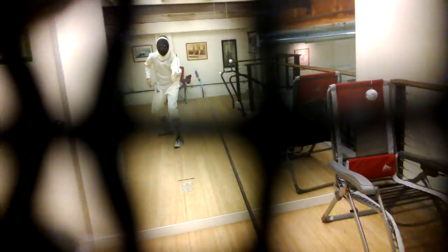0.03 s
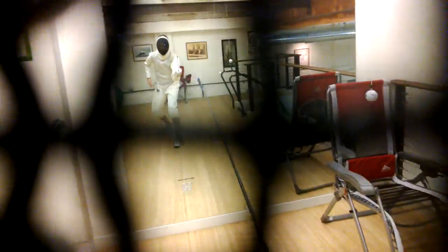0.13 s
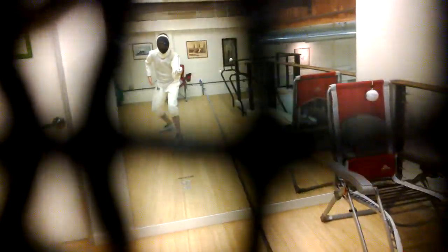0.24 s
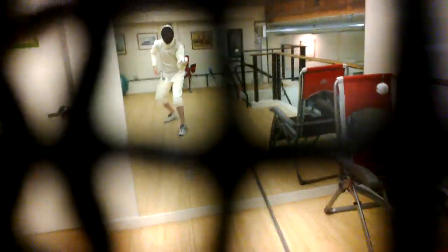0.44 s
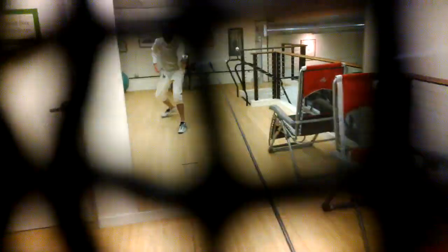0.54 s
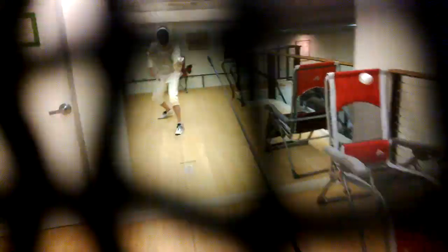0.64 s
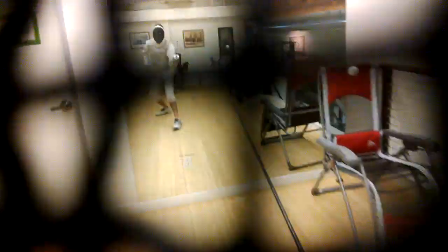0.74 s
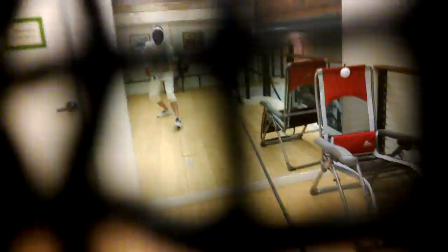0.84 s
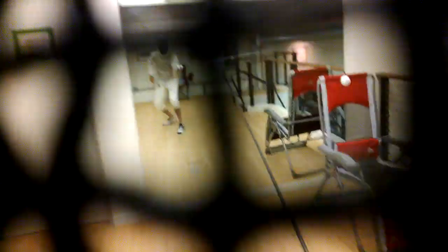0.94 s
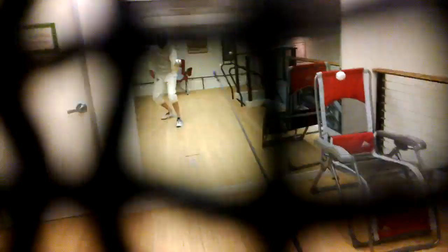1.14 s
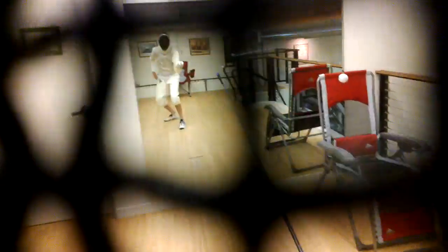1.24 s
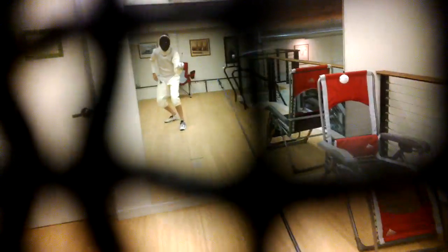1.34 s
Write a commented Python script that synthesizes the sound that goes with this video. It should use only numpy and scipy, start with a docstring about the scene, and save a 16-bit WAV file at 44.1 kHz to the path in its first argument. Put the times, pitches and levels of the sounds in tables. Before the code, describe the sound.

Steel fencing swords snap together, grate and ring at close range in a lightly echoing indoor hall

```python
"""Two fencing blades meet four times, then graze faintly, in a hall: each contact snaps, then scrapes. The
scrape is noise with tiny clicks, coloured by the steel; the guard hums along as filtered friction. The blades
and the guard sing in pairs of close sine tones that beat, with a few short squeals. Knocks (a noise tick plus
guard ring), dull scuffs, a late low rumble and quiet hall noise are shaped noise. A fading noise tail gives the
echo of the hall."""
import sys
import numpy as np
from scipy import signal
from scipy.fft import rfft, irfft, next_fast_len
from scipy.io import wavfile
from scipy.ndimage import uniform_filter1d, map_coordinates

SR = 44100
rng = np.random.default_rng(int(sys.argv[2]) if len(sys.argv) > 2 else 0)


def digitize_waveform(pressure):
    """Quantize a signal to 16-bit integers and store it at the path in sys.argv[1].

    Rows of a 2-D input are taken as channels; values are limited to [-1, 1].
    """
    field = np.atleast_2d(pressure).T
    bounded = np.clip(field, -1, 1)
    quanta = np.round(bounded * 32767).astype(np.int16)
    wavfile.write(sys.argv[1], SR, quanta)


N = 61739  # length in samples


def amp(db):
    """Turn decibels into a gain."""
    return 10 ** (np.asarray(db) / 20)


def unit(x):
    """Scale to an average (rms) strength of 1."""
    return x / np.sqrt(np.mean(x ** 2) + 1e-20)


def clock():
    """The time of each sample, in seconds."""
    return np.arange(N) / SR


def along(points, hz):
    """Read a curve of (frequency, value) points on a log frequency axis."""
    f, v = np.transpose(points)
    return np.interp(np.log(hz + 1), np.log(f + 1), v)


def wobble(position):
    """A smooth random curve with one random knot per unit of position."""
    knots = rng.standard_normal(int(position.max()) + 4)
    return map_coordinates(knots, [position])


def filtered(x, response):
    """Shape the spectrum of x with a response, given as a function of frequency."""
    m = next_fast_len(N + SR // 2)
    hz = np.fft.rfftfreq(m, 1 / SR)
    return irfft(rfft(x, m) * response(hz), m)[..., :N]


def noise(points):
    """Noise of rms 1 with the given colour."""
    return unit(filtered(rng.standard_normal(N), lambda hz: amp(along(points, hz))))


def envelope(start, rise, hold, t60):
    """Rise from the start, begin to fade hold s after it, and lose 60 dB every t60 s."""
    t = clock() - start
    fade = amp(-60 * np.maximum(t - hold, 0) / t60)
    return np.clip(t / rise, 0, 1) * fade


# colour of the quiet hall noise: (frequency [Hz], level [dB])
QUIET_COLOUR = [(20, -1), (55, -9), (150, 2), (300, -7), (600, -5.5), (1200, -19.5), (4000, -37.5),
                (14000, -55.5)]
QUIET_DB = -80


def quiet():
    """The quiet of the hall: steady, mostly low noise."""
    return amp(QUIET_DB) * noise(QUIET_COLOUR)


# colour of the low rumble: (frequency [Hz], level [dB])
RUMBLE_COLOUR = [(20, -25.5), (54, 1), (75, -16), (145, -8), (220, -14.5), (400, -19.5), (900, -29),
                 (3000, -76)]
RUMBLE_AT_S, RUMBLE_RISE_S, RUMBLE_HOLD_S, RUMBLE_T60_S, RUMBLE_DB = 1.023, 0.15, 0.19, 1, -59


def rumble():
    """A late rumble: low noise that swells slowly and fades."""
    shape = envelope(RUMBLE_AT_S, RUMBLE_RISE_S, RUMBLE_HOLD_S, RUMBLE_T60_S)
    return amp(RUMBLE_DB) * noise(RUMBLE_COLOUR) * shape


# time for the hall echo to fall by 60 dB: (frequency [Hz], fade time [s])
HALL_FADE = [(200, .8), (1200, 0.67), (2500, 0.85), (4500, 0.73), (8000, 0.49), (13000, 0.31)]
WALL_DELAY_S = .02


def hall(x):
    """The hall answers after a short delay with a noise tail; its high treble dies first."""
    hz, t, z = signal.stft(rng.standard_normal(SR), SR, nperseg=256)
    fade = amp(-60 * t / along(HALL_FADE, hz)[:, None])
    tail = signal.istft(z * fade, SR, nperseg=256)[1]
    delayed = np.pad(x, (int(WALL_DELAY_S * SR), 0))
    return signal.fftconvolve(delayed, tail / np.linalg.norm(tail))[:N]


# dull scuffs: (time [s], level [dB], rise [s], time to fade by 60 dB [s])
SCUFF_EVENTS = [(0.429, -62, 0.027, 0.31), (0.573, -43.5, 0.014, 0.97), (0.883, -41, 0.0076, 0.4),
                (1.06, -65, 0.024, 1.6)]
# colour of a scuff: (frequency [Hz], level [dB])
SCUFF_COLOUR = [(60, -46), (115, -29), (175, -7), (400, -2), (750, 4), (1400, 2.5), (2300, -13),
                (4000, -18.5), (12000, -50)]


def scuffs():
    """Dull scuffs: noise strongest in the middle range, rising quickly and fading."""
    return sum(amp(db) * noise(SCUFF_COLOUR) * envelope(s, rise, rise, t60)
               for s, db, rise, t60 in SCUFF_EVENTS)


GRAINS_PER_S, GRAIN_SHARE = 1500, .35  # clicks per second, their share of the power


def friction():
    """Rough steel rubbing: tiny random collisions over a smooth hiss."""
    hits = rng.random(N) < GRAINS_PER_S / SR
    grains = unit(hits * rng.uniform(-1.04, 1, N))
    hiss = rng.standard_normal(N)
    return np.sqrt(GRAIN_SHARE) * grains + np.sqrt(1 - GRAIN_SHARE) * hiss


# resonances of the guard: (frequency [Hz], width [Hz], level [dB])
GUARD_MODES = [(570, 200, -21), (779, 90, -11.5), (935, 59, -6.5), (1019.6, 45, 1.5), (1084, 50, -5.5),
               (1214.4, 67, 8), (1348, 70, -19.5), (1446, 170, -6), (1675, 150, -6.5), (1790, 35, -12.5),
               (2230, 250, -14.5)]
GUARD_LOW_HZ = 473  # the thin guard radiates little below this
GUARD_RIPPLE_DB, GUARD_RIPPLE_HZ = 2, 45  # random unevenness, and its spacing in frequency


def guard():
    """The guard's resonances, shaken by friction, at rms 1; their balance differs from blow to blow."""
    def response(hz):
        body = sum(amp(db) / (1 + ((hz - f) / (w / 2)) ** 2) for f, w, db in GUARD_MODES)
        radiation = hz ** 4 / (hz ** 4 + GUARD_LOW_HZ ** 4)
        return body * radiation * amp(GUARD_RIPPLE_DB * wobble(hz / GUARD_RIPPLE_HZ))

    hum = filtered(friction(), response)
    # even out the loudness over about 16 ms (700 samples)
    power = np.abs(uniform_filter1d(hum ** 2, size=700))
    return unit(hum / np.sqrt(power + 1e-12))


# knocks on the guard: (time [s], ring level [dB], tick level [dB])
KNOCK_EVENTS = [(.236, -37.5, -60), (0.8444, -36, -64), (0.8894, -44, -52), (0.8931, -64, -26.5),
                (0.9042, -60, -39.5), (0.931, -39.5, -60), (.941, -41, -56), (1.066, -50, -70)]
# colour of the tick: (frequency [Hz], level [dB])
TICK_COLOUR = [(100, -25), (400, -7.5), (1000, -1.5), (2300, 7.5), (4000, -19), (9000, -19.5), (14000, -19)]
RING_T60_S, TICK_T60_S = 0.047, 0.01424


def knocks():
    """Knocks on the guard: each is a dry tick of noise and a short ring of the guard."""
    out = np.zeros(N)
    for s, ring_db, tick_db in KNOCK_EVENTS:
        out += amp(ring_db) * guard() * envelope(s, 0.0022, 0.0017, RING_T60_S)
        out += amp(tick_db) * noise(TICK_COLOUR) * envelope(s, 0.0017, 0, TICK_T60_S)
    return out


# ringing modes of the blades and the guard: (start [s], frequency [Hz], beat rate [Hz], level [dB], swell [s],
# hold from the start [s], time to fade by 60 dB [s])
SINGING_MODES = [(.22, 1610, 63, -44, .03, 0.081, 0.68), (.22, 2235, 120, -52, 0.013, 0.14, 0.27),
                 (.215, 1210, 22, -40.5, 0.013, 0.047, .45), (.424, 850, 21, -50, .04, 0.18, 1),
                 (0.59, 1035, 5, -40, 0.087, .13, 0.27), (0.54, 1205, 15, -33.5, 0.065, 0.039, 0.39),
                 (0.492, 1817, 44, -40.5, 0.031, .21, 0.55), (0.74, 1817, 44, -43.5, 0.063, 0.059, 0.69),
                 (.424, 2690, 19, -58, 0.08, 0.47, 0.25), (0.43, 3728, 29, -44, 0.047, 0.25, 0.62),
                 (.424, 4845, 23, -40.5, 0.037, 0.27, .3), (.424, 4700, 31, -55, .1, 0.34, 0.28),
                 (0.41, 6200, 20, -66, .08, 0.57, .35), (.424, 7585, 26, -55, 0.068, 0.46, .35),
                 (0.428, 9170, 18, -51, .08, 0.1, .35), (0.83, 932, 22, -46, 0.026, 0.057, 0.44),
                 (.925, 1190, 70, -40, 0.0092, 0.017, 0.13), (1.051, 1130, 36, -50, 0.018, 0.043, 0.43)]
# squeals as the blade sticks and slips: (time [s], width [s], level [dB])
SQUEAL_SPURTS = [(.526, .011, -26), (0.567, 0.0048, -25.5), (0.674, 0.027, -32.5), (0.755, 0.007, -30.5)]
SQUEAL_HZ = 4845
BEAT_DEPTH = .55  # strength of the second tone of a pair
SING_WANDER, SING_WAVER_DB = .65, 1.5  # random drift of phase [radians] and of level


def singing():
    """Pairs of close modes of the blades and guard swell and beat; one high mode also squeals in short spurts."""
    t, out = clock(), np.zeros(N)

    def tone(hz):
        return np.sin(2 * np.pi * (hz * t + rng.random()) + SING_WANDER * wobble(t * 40))

    for s, hz, beat, db, swell, hold, t60 in SINGING_MODES:
        pair = tone(hz) + BEAT_DEPTH * tone(hz - beat)
        level = amp(db + SING_WAVER_DB * wobble(t * 25))
        out += level * pair * envelope(s, swell, hold, t60)
    spurts = sum(amp(db) * np.exp(-.5 * ((t - s) / width) ** 2) for s, width, db in SQUEAL_SPURTS)
    return out + tone(SQUEAL_HZ) * spurts


# colour of the scrape: (frequency [Hz], level [dB])
STEEL_COLOUR = [(1120, -45.5), (1900, -11), (2250, -11), (3030, -17.5), (3620, -11.5), (3900, -12.5),
                (5310, -8.5), (6440, -5), (9220, -1.5), (12400, -2.5), (14000, -7)]
# treble resonances of the blades: (frequency [Hz], width [Hz], lift [dB])
BLADE_MODES = [(4443, 110, 7), (5620, 220, 4.5), (6390, 180, 7.5), (6810, 90, 7.5), (7620, 180, 5),
               (8266, 180, 7.5), (8650, 70, 0.5), (9106, 90, 8), (9400, 40, 5.5), (9870, 90, 6.5),
               (11200, 100, 0.5), (11020, 180, 7), (11610, 60, 7.5), (12000, 130, -2.5)]
STEEL_LOW_HZ = 1763  # the scrape weakens below this
RIPPLE_DB, RIPPLE_HZ = 3, 75  # random unevenness, and its spacing in frequency


def steel(hz):
    """How the blades colour friction: a broad curve, resonances and random ripple."""
    lift = sum(db / (1 + ((hz - f) / (w / 2)) ** 2) for f, w, db in BLADE_MODES)
    ripple = RIPPLE_DB * wobble(hz / RIPPLE_HZ)
    low_cut = hz ** 4 / (hz ** 4 + STEEL_LOW_HZ ** 4)
    return amp(along(STEEL_COLOUR, hz) + lift + ripple) * low_cut


# blade contacts: (time [s], scrape level [dB], hold [s], scrape time to fade by 60 dB [s],
# treble tilt at the start [dB per octave], dulling [dB per octave per s],
# guard level [dB], guard time to fade by 60 dB [s], snap level [dB])
BLADE_CONTACTS = [(0.015, -46, 0.078, 0.41, 2.5, 26, -58.5, 0.95, -63),
                  (0.2089, -26.5, 0.1, 0.24, 3, 32, -44.5, 0.55, -30),
                  (.424, -28, 0.092, 0.69, -0.5, 36, -40.5, 1, -22),
                  (0.8396, -33.5, 0.048, 0.036, -1.5, 14, -39.5, 0.21, -39.5),
                  (1.035, -66, .12, 0.22, -10.5, 22, -59.5, .4, -79.5)]
SNAP_S, SNAP_T60_S = 0.0076, 0.031  # length of the first bite, and its fade
BOUNCE_S, SCRAPE_RISE_S = 0.012, .009  # rebound before the blades bind, then the rise of the scrape
SCRAPE_FLOOR = 0.35  # share of the scrape level during the rebound
GUARD_RISE_S = .004
CHATTER_DB, CHATTER_PER_S = 1.45, 110  # random shaking of the scrape level


def contacts():
    """Each contact bites, rebounds, then binds and scrapes, growing duller; the guard hums with it."""
    out = np.zeros(N)
    for s, db, hold, t60, tilt, dulling, guard_db, guard_t60, snap_db in BLADE_CONTACTS:
        hz, t, z = signal.stft(unit(filtered(friction(), steel)), SR, nperseg=256)
        # tilt the treble around 8 kHz; the dulling stops after 0.35 s
        octaves = np.log2(np.clip(hz, 3000, None) / 8000)[:, None]
        slope = tilt - dulling * np.clip(t - s, 0, .35)
        scrape = signal.istft(z * amp(octaves * slope), SR, nperseg=256)[1][:N]

        grip = np.clip((clock() - s - BOUNCE_S) / SCRAPE_RISE_S, 0, 1)
        bind = SCRAPE_FLOOR + (1 - SCRAPE_FLOOR) * grip
        chatter = CHATTER_DB * wobble(clock() * CHATTER_PER_S)
        pressure = amp(db + chatter) * bind * envelope(s, .001, hold, t60)
        snap = amp(snap_db) * envelope(s, .001, SNAP_S, SNAP_T60_S)
        out += scrape * np.hypot(pressure, snap)  # snap and scrape add as powers
        out += amp(guard_db) * guard() * np.sqrt(bind) * envelope(s, GUARD_RISE_S, hold, guard_t60)
    return out


# colour of the difference between left and right: (frequency [Hz], level [dB])
WIDTH_COLOUR = [(100, -3), (1000, -25), (2500, 9), (5000, -13.5), (9000, -44.5), (13000, -8.5)]
SIDE_DB = -22  # added to the levels above
HALL_DB, SING_HALL_DB = -12, -16  # what blows and singing send to the hall


def scene():
    """Mix everything nearly mono, with a little stereo width, most of it around 2.5 kHz."""
    blows, ring = contacts() + knocks(), singing()
    echo = hall(amp(HALL_DB) * blows + amp(SING_HALL_DB) * ring)
    mid = blows + ring + echo + scuffs() + rumble() + quiet()

    def spread(hz):
        random_phase = np.exp(2j * np.pi * wobble(hz / 200))
        return amp(along(WIDTH_COLOUR, hz)) * random_phase

    side = amp(SIDE_DB) * filtered(mid, spread)
    return np.array([mid + side, mid - side])


TOP_HZ = 13960  # upper band limit


def record(dry):
    """Cut steeply above the band limit: 1 dB more for every 12 Hz, down to -120 dB."""
    return filtered(dry, lambda hz: amp(-np.clip((hz - TOP_HZ) / 12, 0, 120)))


dry = scene()
out = record(dry)
digitize_waveform(out)
```